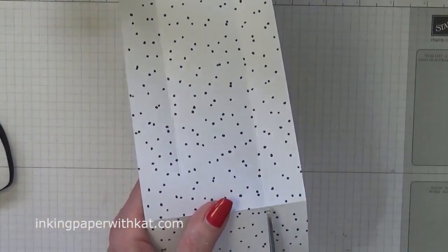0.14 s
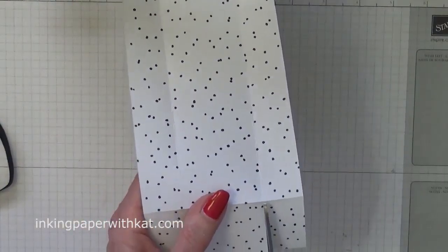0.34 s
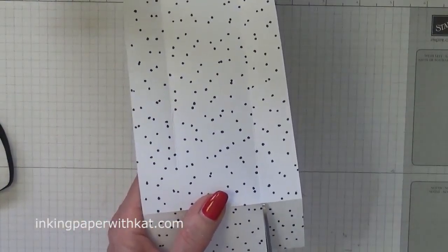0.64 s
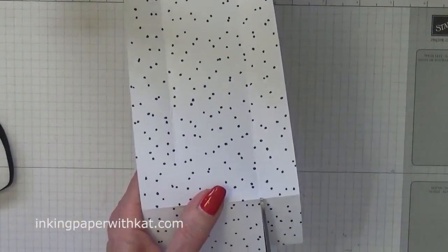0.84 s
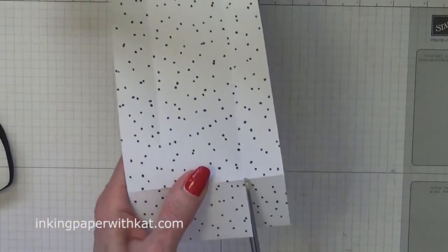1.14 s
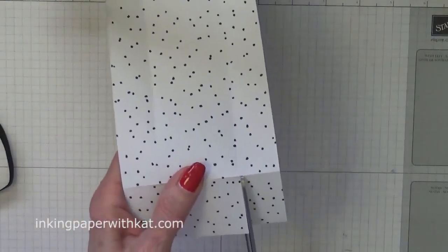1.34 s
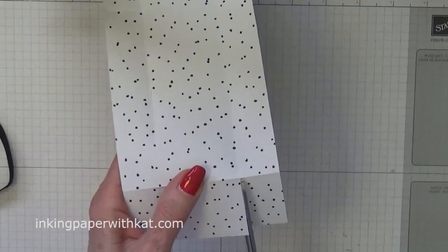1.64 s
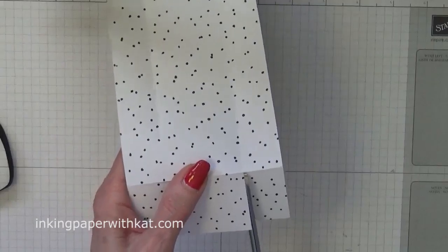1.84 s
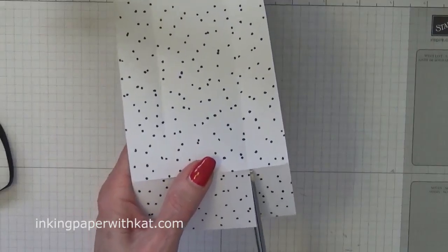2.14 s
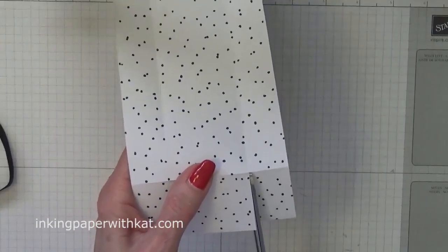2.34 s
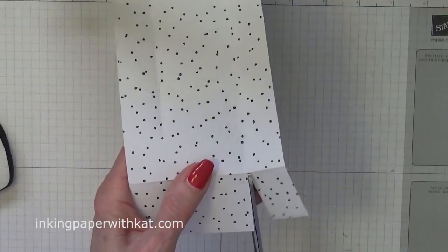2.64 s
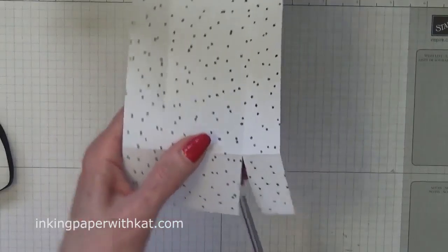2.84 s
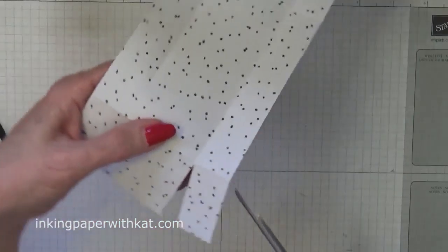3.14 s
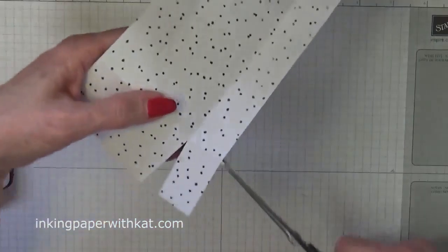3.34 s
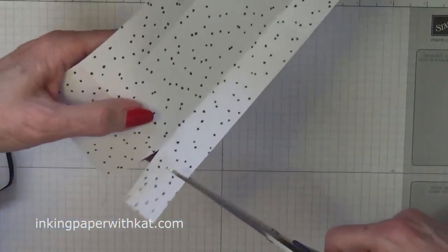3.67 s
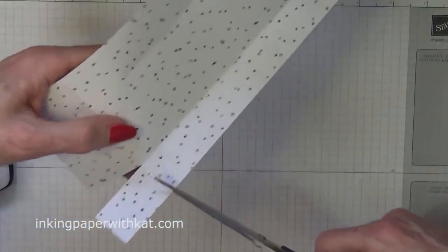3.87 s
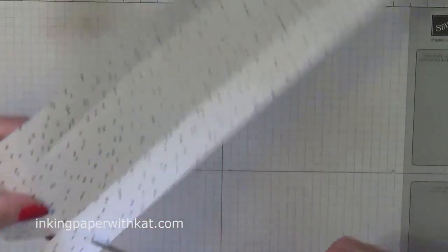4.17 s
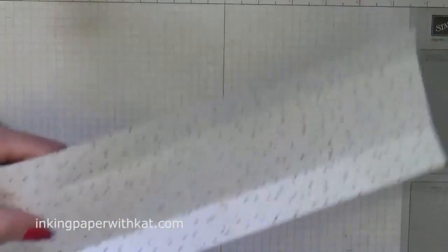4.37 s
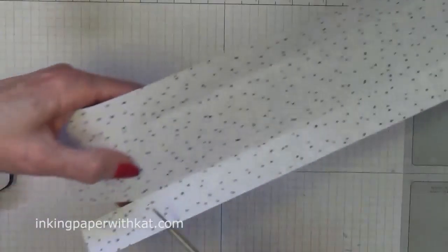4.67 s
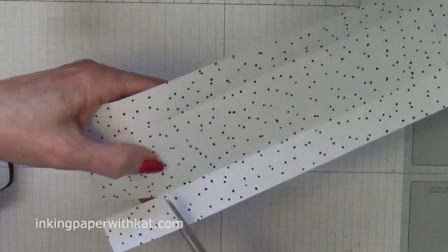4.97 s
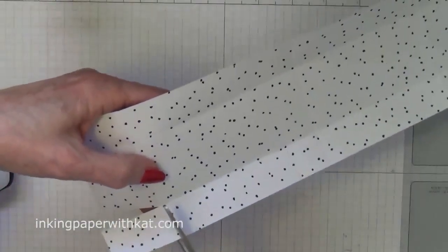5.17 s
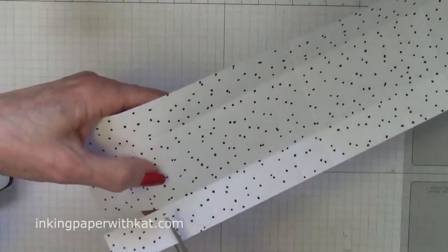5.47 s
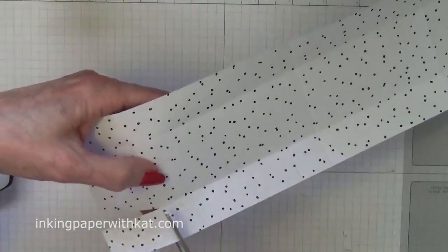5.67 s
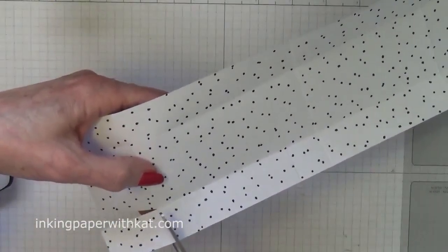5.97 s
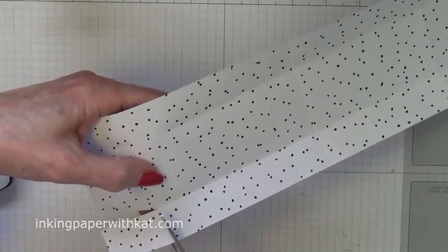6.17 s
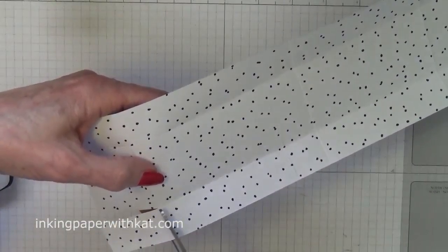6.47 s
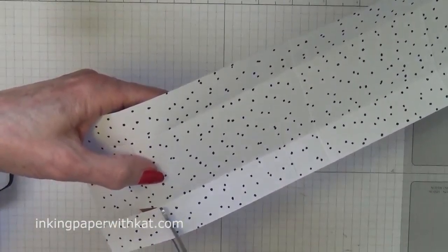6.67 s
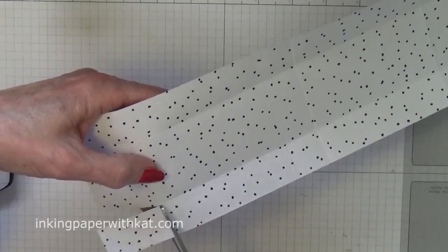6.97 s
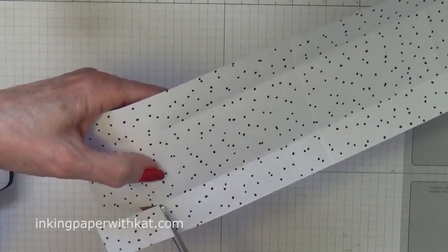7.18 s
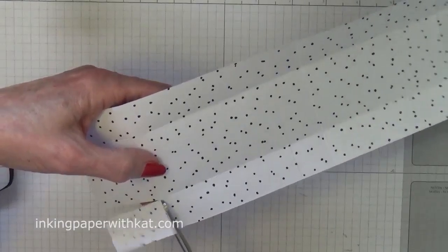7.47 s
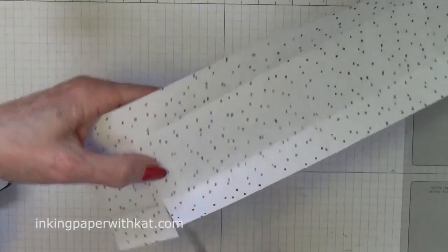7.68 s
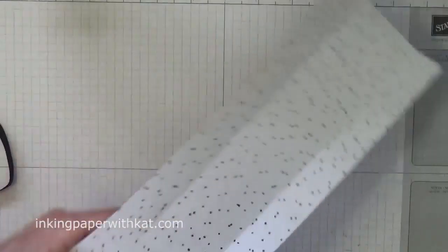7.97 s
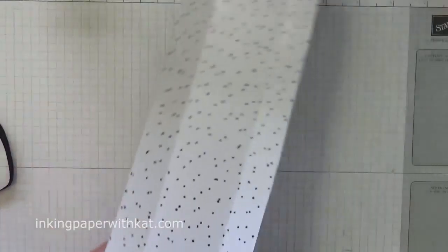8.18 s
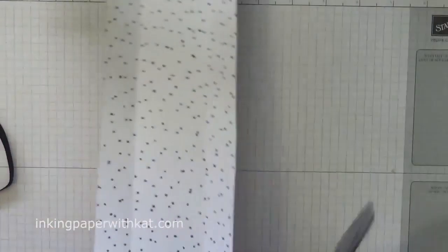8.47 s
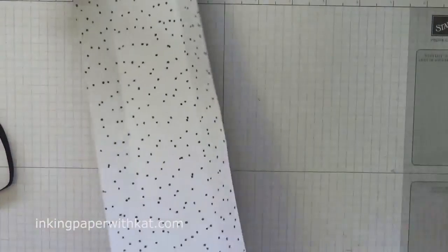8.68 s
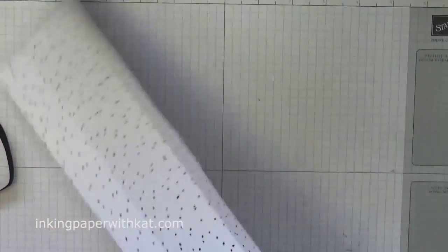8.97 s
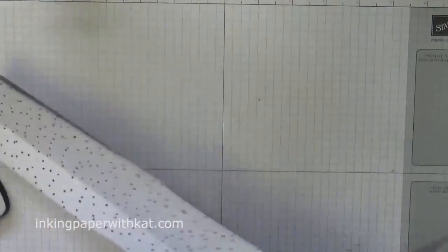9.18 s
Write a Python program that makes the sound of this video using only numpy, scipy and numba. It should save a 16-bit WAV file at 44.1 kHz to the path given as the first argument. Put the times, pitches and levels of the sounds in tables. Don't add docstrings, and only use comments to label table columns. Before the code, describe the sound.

Small scissors cut a folded strip of stiff paper over a desk, heard by a nearby camera microphone. Sparse soft clicks and rubs come first, then a busy crackling turn and one hard snap. A lull follows, then fine clipping quickens to another crisp snip, and the sheet rustles and flaps at the end. Faint room air, distant traffic drone and fast mechanical ticking continue throughout.

```python
import sys
import numpy as np
from scipy import signal
from scipy.fft import rfft, irfft, next_fast_len
from scipy.io import wavfile
from scipy.ndimage import uniform_filter1d
from numba import njit

SR = 44100
rng = np.random.default_rng(int(sys.argv[2]) if len(sys.argv) > 2 else 0)


def volts_from_decibels(level):
    exponent = np.asarray(level, float) / 20
    return 10 ** exponent


def put_to_file(sound):
    columns = np.atleast_2d(sound).T
    safe = np.clip(columns, -1, 1)
    whole_steps = np.round(safe * 32767)
    wavfile.write(sys.argv[1], SR, whole_steps.astype(np.int16))


N = 411012
T = np.arange(N) / SR
SIDES = np.array([[1], [-1]])


def level(x, db):
    return x * volts_from_decibels(db) / np.sqrt(np.mean(x ** 2))


def colour(x, points):
    hz, db = np.transpose(points)
    n = next_fast_len(len(x))
    f = np.arange(1, n // 2 + 2) * SR / n
    gain = volts_from_decibels(np.interp(np.log(f), np.log(hz), db))
    return irfft(rfft(x, n) * gain, n)[:len(x)]


def walk(rate):
    hold = int(SR / rate)
    steps = np.repeat(rng.standard_normal(N // hold + 1), hold)
    return 1.14 * uniform_filter1d(uniform_filter1d(steps, hold), hold)[:N]


def ring(x, modes):
    n = x.shape[-1]
    f = np.arange(n // 2 + 1) * SR / n
    response = 0
    for k, (hz, width, db) in enumerate(modes):
        damping = 1j * f * width
        response = response + (-1) ** k * volts_from_decibels(db) * damping / (hz ** 2 - f ** 2 + damping)
    return irfft(rfft(x) * response, n)


def patchy(x, modes, patchy_db, rate):
    out = 0
    for k, (hz, width, db) in enumerate(modes):
        b, a = signal.iirpeak(hz, hz / width, SR)
        out = out + (-1) ** k * volts_from_decibels(db) * signal.lfilter(b, a, x * volts_from_decibels(patchy_db * walk(rate)))
    return out


@njit
def sweep(x, hz, sharp):
    y, band, low, k = np.empty(len(x)), 0., 0., 1 / sharp
    for i in range(len(x)):
        g = np.tan(np.pi * hz[i] / SR)
        v = (band + g * (x[i] - low)) / (1 + g * (g + k))
        band, low, y[i] = 2 * v - band, low + 2 * g * v, k * v
    return y


# (frequency [Hz], level per Hz [dB])
AIR_TONE = [(18, -44), (30, -6.5), (123, 2.5), (191, -5), (501, -7), (582, -9), (842, -11), (1160, -10),
            (1380, -15), (2320, -14.5), (3440, -16.5), (3710, -17.5), (4300, -18.5), (11000, -22),
            (14300, -51), (22000, -120)]
# (frequency [Hz], side minus mid [dB])
AIR_WIDTH = [(60, -24), (200, -11), (600, -2), (6000, -4), (11000, -8)]


def air_noise():
    mid = colour(rng.standard_normal(N), AIR_TONE)
    side = colour(colour(rng.standard_normal(N), AIR_TONE), AIR_WIDTH)
    return volts_from_decibels(.5 * walk(3.29)) * level(mid + SIDES * side, -59.5)


# (frequency [Hz], width [Hz], level [dB])
DUCT_NOTES = [(314, 14, 12), (487, 81, -20), (1157, 94, 3), (1920, 88, 7.5)]


def duct():
    mid = patchy(rng.standard_normal(N), DUCT_NOTES, 1.9, 5.5)
    side = patchy(rng.standard_normal(N), DUCT_NOTES, 1.9, 5.5)
    return level(mid + 0.52 * SIDES * side, -71.5)


def mains_hum():
    return np.sqrt(2) * volts_from_decibels(-73 + 1.5 * walk(3.5)) * np.sin(2 * np.pi * 120 * T)


# (time [s], level [dB])
TRAFFIC = [
    (0.0, -66),
    (0.52, -61),
    (1.95, -62.5),
    (2.05, -72),
    (3.6, -56.5),
    (4.36, -73),
    (4.98, -67),
    (9.32, -75),
]


def traffic_drone():
    turning = np.cumsum(46 * (1 + .045 * walk(3.7))) / SR
    drone_db = np.interp(T, *np.transpose(TRAFFIC)) + 2.2 * walk(14)
    return np.sqrt(2) * volts_from_decibels(drone_db) * np.sin(2 * np.pi * turning)


# (time [s], pitch [Hz], level [dB])
PASSING_ENGINE = [
    (0, 80, -78),
    (5.5, 72, -75),
    (7.0, 74, -76),
    (7.15, 77, -62),
    (8.3, 82, -69),
    (8.5, 82, -78),
]


def passing_engine():
    s, hz, db = np.transpose(PASSING_ENGINE)
    turning = np.cumsum(np.interp(T, s, hz)) / SR
    return np.sqrt(2) * volts_from_decibels(np.interp(T, s, db) + 2.0 * walk(3.4)) * np.sin(2 * np.pi * turning)


def focus_motor():
    first_s, step_s = .0592, 1001 / 30000
    starts = np.arange(first_s, N / SR - .01, step_s)
    weak = np.arange(len(starts)) % 2
    steps = np.zeros(N)
    steps[(starts * SR).astype(int)] = volts_from_decibels(1.6 * rng.standard_normal(len(starts)) - 6.3 * weak)
    length = int(.002 * SR)
    push = np.hanning(length) * np.cos(2 * np.pi * 3700 * T[:length])
    shell = [(3720, 150, 11), (2900, 400, -8)]  # (frequency [Hz], width [Hz], level [dB])
    tick = patchy(np.convolve(steps, push)[:N], shell, 1, 1.83)
    return tick * volts_from_decibels(-57.5) / np.percentile(np.abs(tick), 99.5)


def room(x, t60, wet_db):
    t = np.arange(int(.4 * SR)) / SR
    shared, apart = rng.standard_normal((2, len(t))) * (t > .002)
    noise = shared + 0.5 * apart * SIDES
    low = signal.lfilter([.3], [1, -.7], noise)
    tail = low * np.exp(-np.log(1000) * t / t60) + .5 * (noise - low) * np.exp(-np.log(1000) * t / 0.06)
    tail = tail * volts_from_decibels(wet_db) / np.sqrt(np.sum(tail ** 2) / 2)
    return signal.fftconvolve(x[None], tail, axes=1)[:, :N]


# (time [s], pitch [Hz])
FLAP_NOTE = [(0, 1060), (.12, 1070), (.15, 615), (.4, 776), (1.15, 820), (3.4, 705), (4.1, 750),
             (4.66, 1120), (4.72, 700), (5.0, 1030), (5.4, 806), (7.5, 1090), (7.7, 756), (8.2, 880),
             (8.38, 1350), (8.7, 990), (8.82, 1450), (8.98, 1020), (9.06, 680), (9.2, 910), (9.28, 486)]


def flap_note():
    return np.interp(T, *np.transpose(FLAP_NOTE))


# (time [s], length [s], face level [dB], sheet level [dB], edge level [dB], change start to end [dB])
RUBS = [(0, 0.052, -54.5, -64.5, -60.5, -5), (0.053, 0.032, -57, -57, -59, -7),
        (0.108, 0.034, -51.5, -59, -63, -3), (0.143, 0.05, -57, -57.5, -68, -24),
        (0.367, 0.027, -45.5, -49, -57.5, -20), (0.393, 0.056, -56, -56.5, -64, -26),
        (0.519, 0.06, -55.5, -63, -63, 1), (0.567, 0.043, -60, -71, -73, -18),
        (0.637, 0.02, -54.5, -64, -60, 0), (0.698, 0.033, -54, -66, -62, -13),
        (0.742, 0.06, -52.5, -57.5, -57, -24), (1.146, 0.028, -51, -73, -58, -29),
        (1.361, 0.053, -47.5, -55.5, -59, -16), (1.56, 0.032, -66, -75, -72, -18),
        (1.74, 0.22, -67, -64, -83, -2), (2.11, 0.035, -67, -67, -59, -18),
        (2.554, 0.056, -56.5, -81, -64.5, -29), (2.736, 0.054, -47.5, -59, -60, 13),
        (2.795, 0.062, -45, -54.5, -52, -3), (2.893, 0.19, -53.5, -62, -66, -12.5),
        (3.415, 0.12, -54, -56, -61, 2), (3.546, 0.068, -38.5, -37, -47.5, 6.5),
        (3.625, 0.095, -44, -53.5, -55, -2), (3.711, 0.15, -49, -55, -60.5, 2),
        (3.857, 0.115, -40.5, -49, -53, 9), (3.985, 0.074, -37, -40, -50, -9),
        (4.054, 0.042, -36.5, -47, -44, -5), (4.107, 0.035, -38, -50, -46.5, -16),
        (4.152, 0.03, -34.5, -46, -48.5, 6), (4.182, 0.091, -50, -61, -57, 6),
        (4.304, 0.043, -34.5, -48, -47.5, 9), (4.351, 0.054, -61, -55, -63, -12),
        (4.49, 0.04, -41.5, -53.5, -41, 4), (4.54, 0.032, -30, -46, -38, -1),
        (4.577, 0.086, -36.5, -51.5, -45.5, -9), (4.667, 0.1, -36.5, -39, -50, -12.5),
        (4.763, 0.14, -46, -45, -59.5, -15.5), (4.979, 0.046, -40.5, -49, -50, 4),
        (5.061, 0.076, -39.5, -52.5, -47.5, -6.5), (5.14, 0.14, -57.5, -59, -69, 11),
        (5.414, 0.055, -44.5, -49.5, -57.5, 5), (5.475, 0.05, -57, -50.5, -73, -9),
        (5.55, 0.16, -57, -60, -67, -11), (5.801, 0.045, -59, -59.5, -73, -7),
        (5.898, 0.043, -53, -56.5, -69, -14), (6.7, 0.09, -60, -69, -71, -11),
        (6.788, 0.11, -53.5, -62, -64, -6), (6.909, 0.12, -55, -62.5, -68, 1),
        (7.06, 0.087, -55, -71, -81, -6), (7.19, 0.11, -62, -76, -67, 5),
        (7.291, 0.073, -46.5, -58, -50, 11), (7.353, 0.061, -58, -68, -62, -16),
        (7.491, 0.037, -45, -62, -57.5, 12), (7.537, 0.039, -55, -46, -61.5, -12),
        (7.565, 0.05, -42, -53, -59, -17), (7.639, 0.049, -33.5, -42, -45.5, -5),
        (7.696, 0.047, -39, -40.5, -44.5, 7), (7.751, 0.055, -41.5, -52, -48, 11),
        (7.822, 0.078, -61, -75, -66.5, -8), (8.18, 0.05, -57.5, -58, -68, -16),
        (8.288, 0.051, -51.5, -72, -56, -14), (8.361, 0.058, -58, -67, -60, -7),
        (8.407, 0.18, -59.5, -65, -66, 3), (8.588, 0.13, -47, -58, -52, -8),
        (8.713, 0.091, -48, -53, -58.5, -23.5), (8.784, 0.097, -38, -48.5, -48, -4),
        (8.871, 0.054, -44.5, -57, -45.5, 13), (8.932, 0.059, -45, -62, -47, -5),
        (8.975, 0.042, -36, -56, -38, -13), (9.02, 0.035, -46, -58, -51, 6),
        (9.049, 0.1, -42, -51.5, -48, -3), (9.159, 0.16, -52.5, -66, -59.5, -14),
        (9.224, 0.055, -54, -58, -53.5, -5), (9.282, 0.04, -49, -53.5, -56, -2)]


def strokes():
    power = np.zeros((3, N))
    for s, length, *db, change_db in RUBS:
        i = int(s * SR)
        t = T[i:i + int((length + .06) * SR)] - T[i]
        start = 1 - np.exp(-t / 0.0028)
        drift = volts_from_decibels(change_db * (np.minimum(t / length, 1) - .5))
        let_go = np.exp(-np.maximum(t - length, 0) / 0.0044)
        power[:, i:i + len(t)] += (volts_from_decibels(np.array(db))[:, None] * start * drift * let_go) ** 2
    return np.sqrt(power)


# (frequency [Hz], width [Hz], level [dB])
SHEET_MODES = [(256, 110, -13.5), (379, 128, -9.5), (594, 148, 0), (750, 133, -1), (1065, 63, -14),
               (1490, 550, -6.5)]
# (frequency [Hz], width [Hz], level [dB])
FACE_MODES = [(1900, 590, -13), (2816, 274, -4.5), (2990, 700, -9.5), (3770, 720, -6), (4500, 2100, -10.5),
              (5665, 900, -10.5)]
# (frequency [Hz], width [Hz], level [dB])
EDGE_MODES = [(6480, 2700, -8), (7880, 570, 5), (8870, 1760, -1), (10620, 1100, 2.5)]


def rubbing(sheet_hz):
    slips_per_s, slip_s = 300, 0.0005
    sizes = volts_from_decibels(5.4 * np.minimum(rng.exponential(size=N), 2.5))
    slips = (rng.random(N) < slips_per_s / SR) * sizes
    slips = signal.lfilter([1], [1, -np.exp(-1 / (slip_s * SR))], slips)
    grip = volts_from_decibels(2.0 * walk(50)) * (1 + 0.32 * slips)
    grip = grip / np.sqrt(np.mean(grip ** 2))
    face, sheet, edge = strokes() * grip * rng.standard_normal((3, N))
    face = volts_from_decibels(12.5) * patchy(face, FACE_MODES, 2.5, 40)
    edge = volts_from_decibels(5.0) * patchy(edge, EDGE_MODES, 2.5, 50)
    flap = volts_from_decibels(15) * sweep(sheet, sheet_hz, 5.2)
    sheet = volts_from_decibels(10.5) * patchy(sheet, SHEET_MODES, 2.5, 25)
    return face + edge + sheet + flap


# (frequency [Hz], width [Hz], level [dB])
BLADE_MODES = [(2900, 950, -3), (5600, 690, -12)]
# (time of peak [s], peak level [dB], ring [Hz], sheet thump over it [dB], edge fizz over it [dB], rise [s])
SNIPS = [(0.1187, -44, 2070, -7, -3, 0.0033), (0.1382, -40.5, 1920, -10, 1.5, 0.0031),
         (0.373, -37.5, 4700, -3, -7.5, 0.0032), (0.3986, -40, 4560, -3, -10, 0.0019),
         (0.4344, -44, 2020, -1, -1, 0.0023), (0.5723, -33, 3150, -8.5, -8.5, 0.0018),
         (0.7064, -40, 2450, -4.5, -3, 0.0012), (0.7598, -36.5, 5930, -8, -1, 0.0032),
         (0.855, -41, 3520, -28, -13, 0.0024), (1.1545, -37.5, 5190, -2, 2, 0.0033),
         (1.3729, -41, 4520, -6.5, -11, 0.0045), (1.539, -45, 3560, -24, -14, 0.0036),
         (1.564, -43, 3500, -14, -6, 0.0017), (2.1186, -31.5, 2476, -12, 0.5, 0.0037),
         (2.4684, -47, 5300, -17, 2.5, 0.0013), (2.7908, -36, 3400, -14, -3.5, 0.001),
         (3.4164, -39.5, 1810, 11, -9, 0.001), (3.5498, -23.5, 1900, 1.5, -2, 0.0015),
         (3.5548, -26, 1900, -10, -2, 0.00089), (3.5634, -28.5, 1950, 6.5, -21, 0.0014),
         (3.5779, -26, 1716, 0, -8, 0.0049), (3.6821, -33, 3550, -14.5, -13, 0.0032),
         (3.981, -29.5, 3100, -2, -1, 0.001), (3.9874, -24.5, 3330, -12, -17, 0.00085),
         (3.9929, -22.5, 3360, -14, -2.5, 0.00082), (4.0049, -34, 3010, -3, 0, 0.00086),
         (4.0194, -30.5, 3100, -1.5, 4.5, 0.00052), (4.0361, -28.5, 3160, -11, -7, 0.0051),
         (4.043, -28, 3120, -22, -6, 0.0014), (4.1078, -27, 3230, -21, -8, 0.0021),
         (4.1795, -30, 3260, -12, -16, 0.0062), (4.3102, -30, 3240, -30, -18, 0.00025),
         (4.3396, -28, 2980, -15.5, -6, 0.002), (4.3526, -32.5, 3400, -14, -12, 0.0028),
         (4.531, -26.5, 5270, -15, -3, 0.0021), (4.5425, -25, 4500, -28, -8, 0.0022),
         (4.554, -16, 3120, -28, -5.5, 0.0025), (4.668, -11.5, 2760, -9, -19, 0.00053),
         (4.7218, -30.5, 2750, -0.5, -23, 0.0034), (5.0145, -33, 3670, -14, -4, 0.0073),
         (5.0776, -35, 3750, -16, -2, 0.0049), (6.8, -37.5, 2650, -18, -6, 0.0025),
         (6.838, -37, 2960, -22, -7, 0.0033), (6.8682, -37.5, 3000, -18, -4, 0.0015),
         (6.8874, -39, 3070, -15, -7, 0.0043), (6.952, -41.5, 2780, -18, -8, 0.0014),
         (7.0674, -42.5, 3050, -14, -7, 0.00083), (7.0948, -45.5, 3060, -2.5, -7, 0.0021),
         (7.1215, -40, 3030, -18, -3, 0.0019), (7.1427, -45, 3080, -15, -2, 0.001),
         (7.1988, -43, 5600, -15, -4, 0.00076), (7.219, -48.5, 3020, -14, -1, 0.0033),
         (7.2347, -43.5, 5710, -16, -3, 0.0021), (7.258, -46.5, 3100, -14, 4, 0.0017),
         (7.278, -36, 3020, -13, -3.5, 0.0022), (7.2876, -35.5, 2630, -21, -5, 0.0012),
         (7.3071, -34.5, 5800, -13, 2, 0.004), (7.329, -32.5, 5000, -22, 1, 0.0007),
         (7.3468, -32, 3230, -16, 1, 0.00067), (7.3581, -25.5, 2520, -14, 2, 0.0035),
         (7.5347, -20.5, 2820, -12.5, -1.5, 0.0013), (7.5495, -36, 1600, 6.5, -10, 0.00074),
         (7.5711, -29, 3770, -2.5, 1, 0.0032), (7.6282, -32.5, 3280, -5, -2, 0.001),
         (7.6837, -30.5, 3140, -6, -4, 0.0049), (7.6914, -30, 2780, -6.5, -5, 0.0038),
         (7.7228, -27.5, 4200, -16, -9, 0.0033), (7.7369, -28.5, 3250, 3, -2, 0.0017),
         (7.7798, -34, 2760, -6, -10, 0.0018), (7.801, -27.5, 3080, -18, -20, 0.0033),
         (8.1838, -41, 3550, -2.5, 2, 0.001), (8.214, -44.5, 2970, -4, -16, 0.0017),
         (8.2768, -41, 2700, -18, 0, 0.001), (8.3026, -38, 3060, -2.5, -12, 0.0049),
         (8.3791, -29.5, 3100, -8, -1, 0.0013), (8.5978, -33, 2220, -4.5, -3, 0.00093),
         (8.7192, -36, 2000, -8, -3, 0.0012), (8.806, -28.5, 1610, -1.5, 1.5, 0.00085),
         (8.8185, -28, 1750, -0.5, -4, 0.0049), (8.8927, -25.5, 5540, -18, -6, 0.0025),
         (8.9141, -27.5, 4740, -17, -5, 0.0044), (8.9482, -22, 4570, -18, -5, 0.00089),
         (8.9776, -24.5, 3140, -19, 4.5, 0.0012), (8.9861, -22.5, 3400, -12, -7, 0.001),
         (9.0614, -35, 2110, -1, 6, 0.00086), (9.1141, -36, 3070, -4, 1, 0.0031),
         (9.2778, -34, 4360, -12, -3.5, 0.0014), (9.2839, -38, 3520, 2, -5.5, 0.0015)]


def cracks(sheet_hz):
    size, lead_s = 2048, .012
    out = np.zeros(N + size)
    t = np.arange(size) / SR - lead_s
    for s, db, hz, sheet_db, edge_db, rise in SNIPS:
        i = int((s - lead_s - .0005) * SR)
        rise = np.clip(rise, .0002, .006)
        shape = np.where(t < 0, np.exp(-(t / rise) ** 2), np.exp(-t / (0.66 * rise + 0.0009)))
        face, sheet, edge = shape * rng.standard_normal((3, size))
        face = ring(face, FACE_MODES + BLADE_MODES)
        note = ring(shape ** 2 * np.cos(2 * np.pi * hz * t), [(hz, hz / 6, 0)])
        note_gain = volts_from_decibels(min(-6 - .5 * edge_db, -1))
        face = face / np.abs(face).max() + note_gain * note / np.abs(note).max()
        sheet = ring(sheet, SHEET_MODES + [(sheet_hz[i], 220, 3)])
        edge = ring(edge, EDGE_MODES)
        for part, over_db in ((face, 0), (sheet, sheet_db), (edge, edge_db)):
            out[i:i + size] += part * volts_from_decibels(db + over_db + 1.5) / np.abs(part).max()
    return out[:N]


def scene():
    background = air_noise() + duct() + mains_hum() + traffic_drone() + passing_engine()
    sheet_hz = flap_note()
    card = rubbing(sheet_hz) + cracks(sheet_hz)
    bounce = volts_from_decibels(-14) * np.roll(np.diff(card, prepend=0), int(.0011 * SR))
    direct = card * volts_from_decibels(0.26 * SIDES) + SIDES * bounce
    return background + focus_motor() + room(card, 0.23, -9) + direct


def band_limit(x):
    return signal.sosfilt(signal.butter(12, 11920, fs=SR, output="sos"), x)


def record(dry):
    top_cut = signal.ellip(8, .3, 75, 10740, fs=SR, output="sos")
    mix = signal.sosfilt(top_cut, dry)
    return band_limit(mix)


dry = scene()
out = record(dry)
put_to_file(out)
```